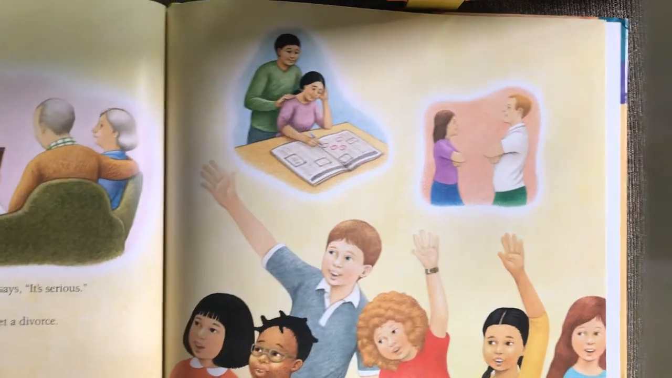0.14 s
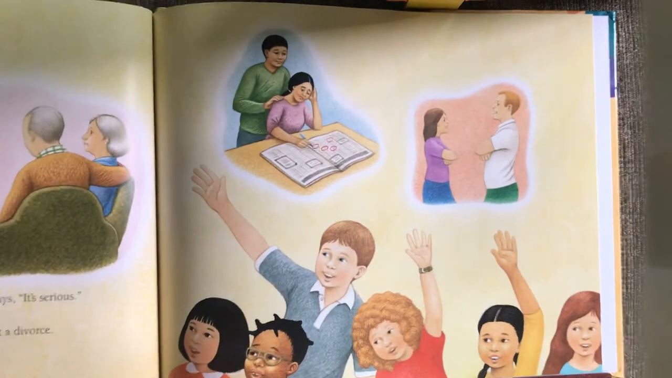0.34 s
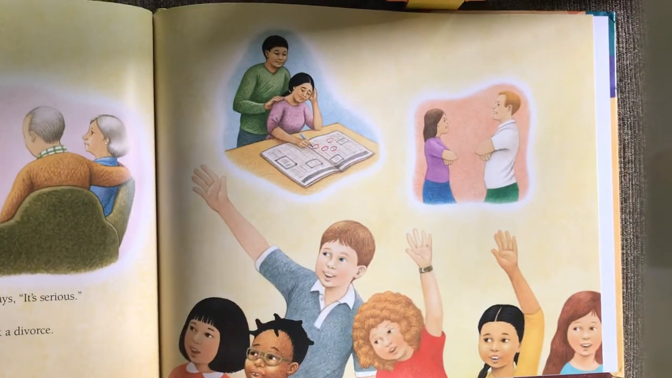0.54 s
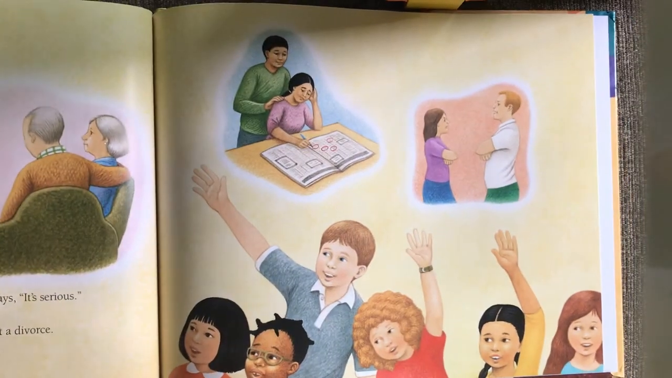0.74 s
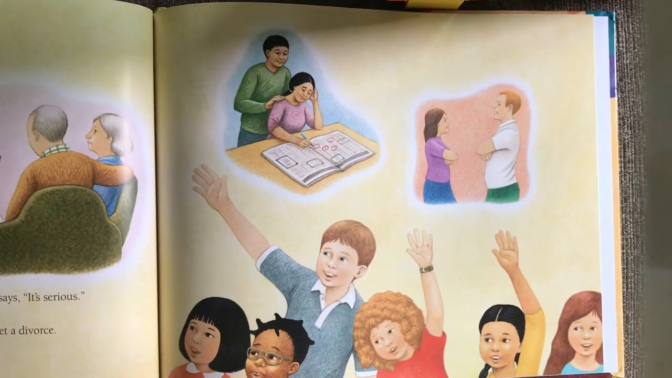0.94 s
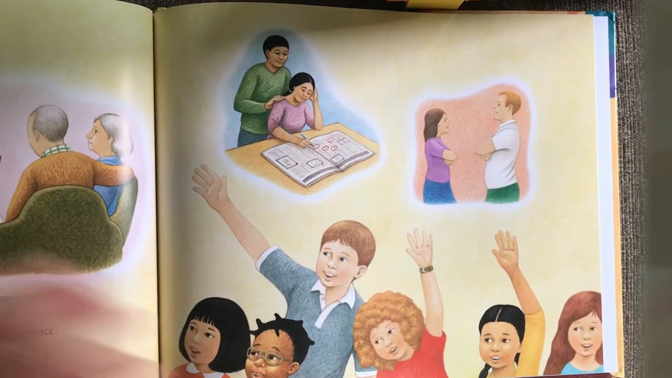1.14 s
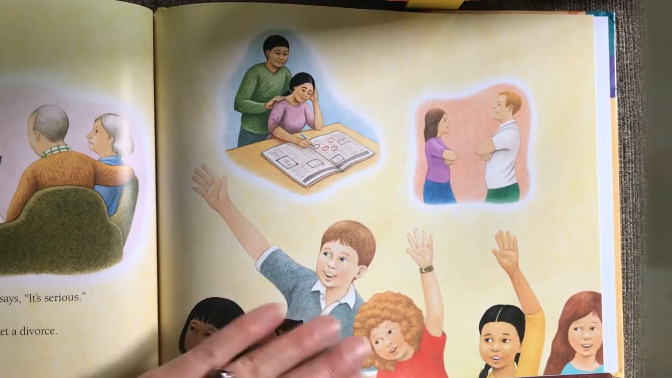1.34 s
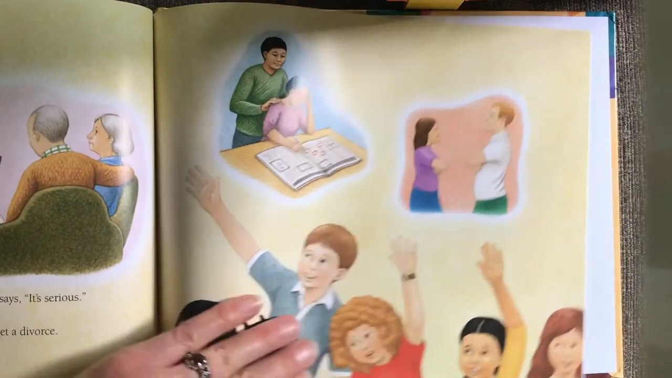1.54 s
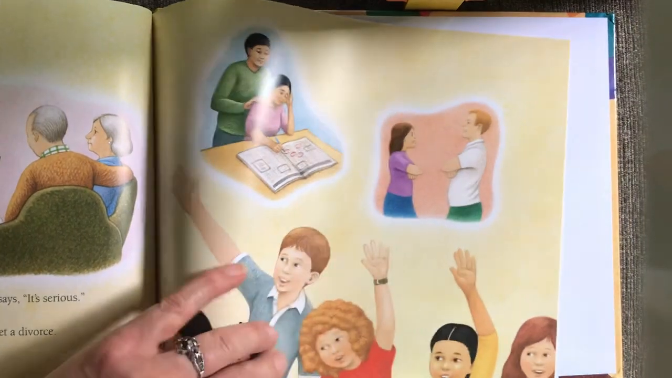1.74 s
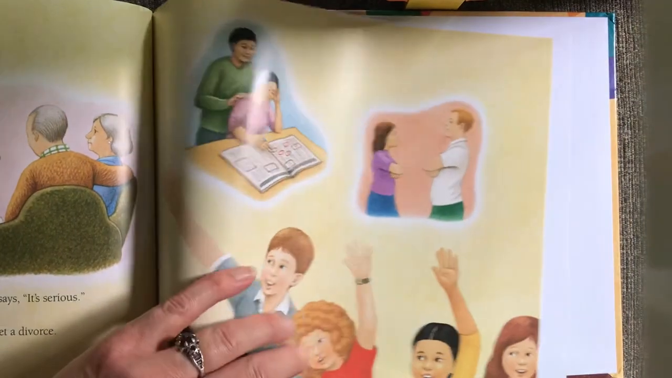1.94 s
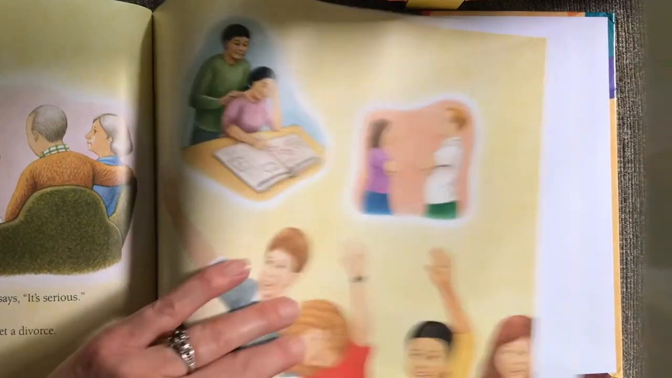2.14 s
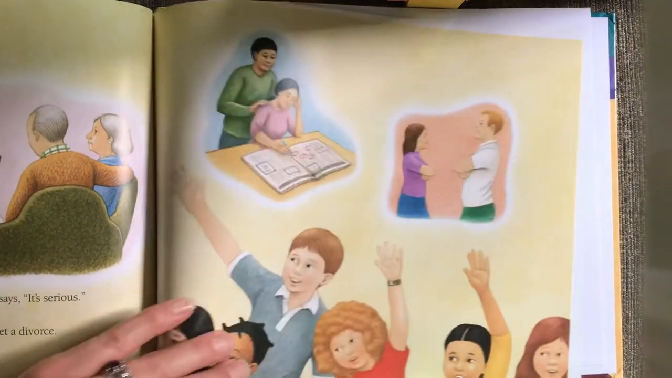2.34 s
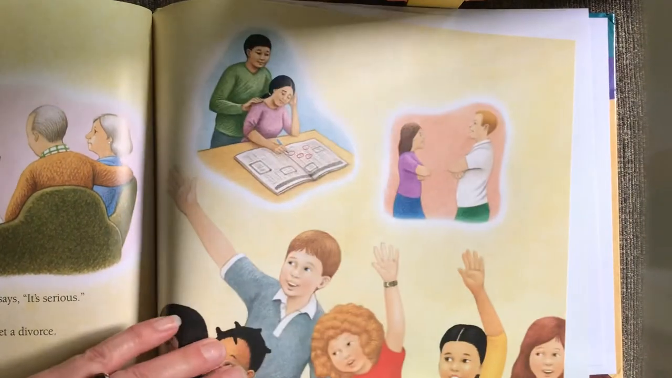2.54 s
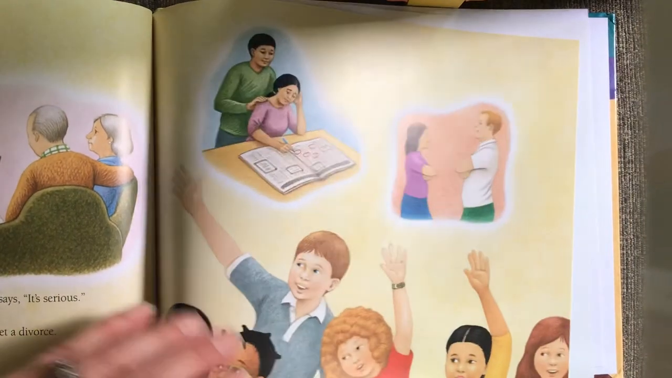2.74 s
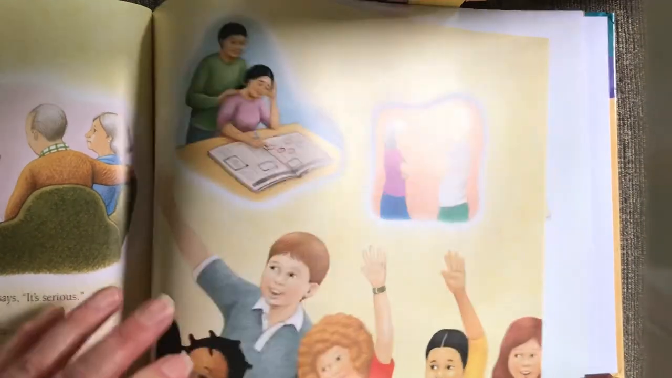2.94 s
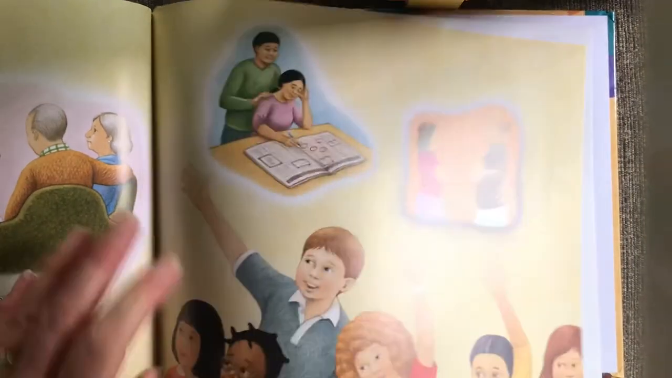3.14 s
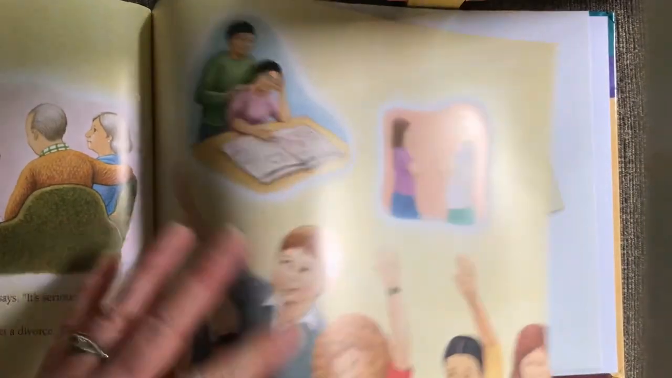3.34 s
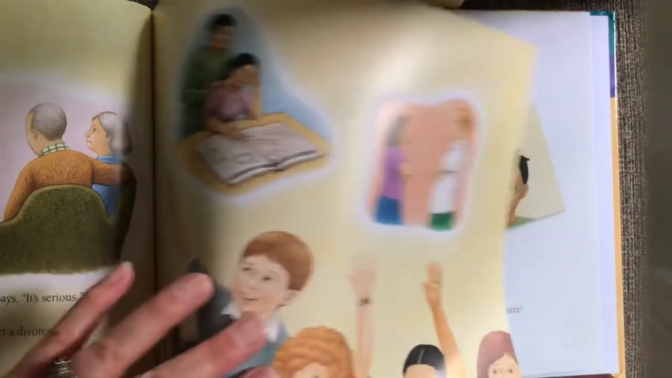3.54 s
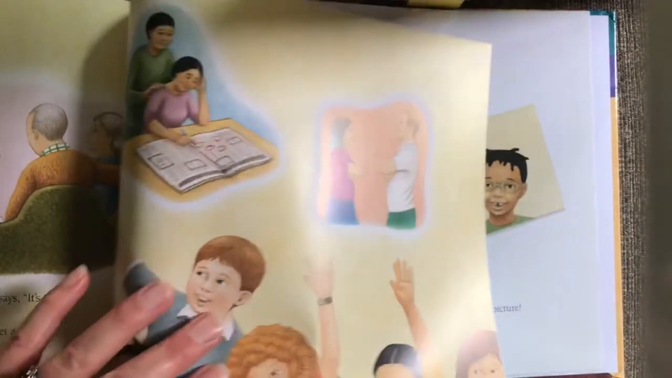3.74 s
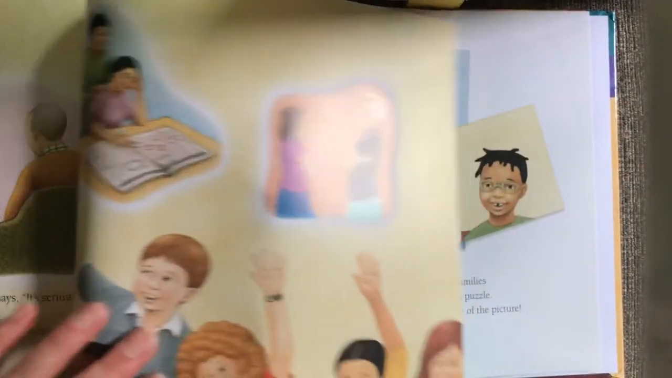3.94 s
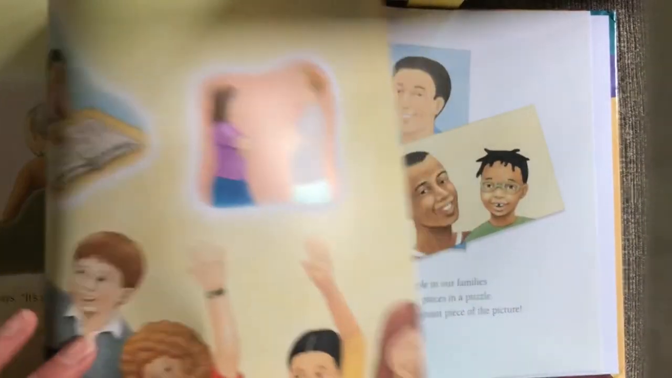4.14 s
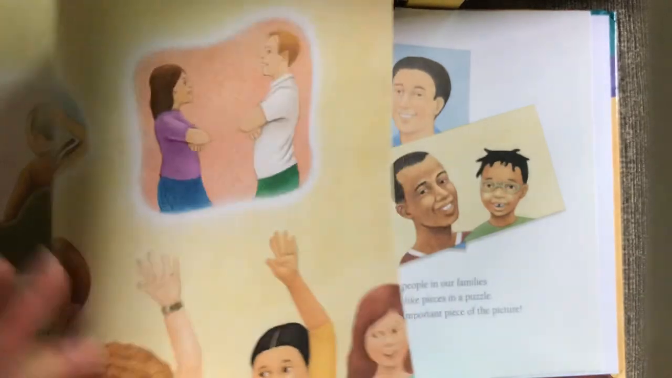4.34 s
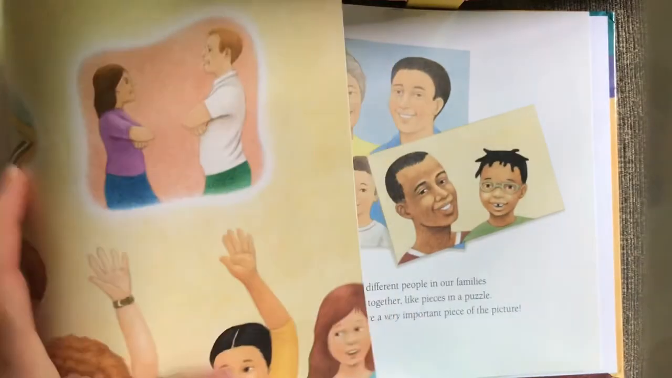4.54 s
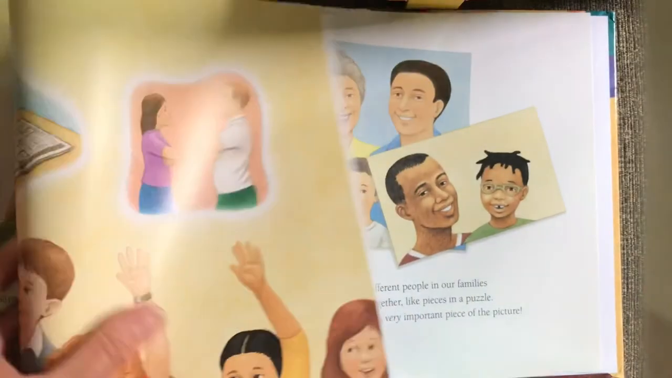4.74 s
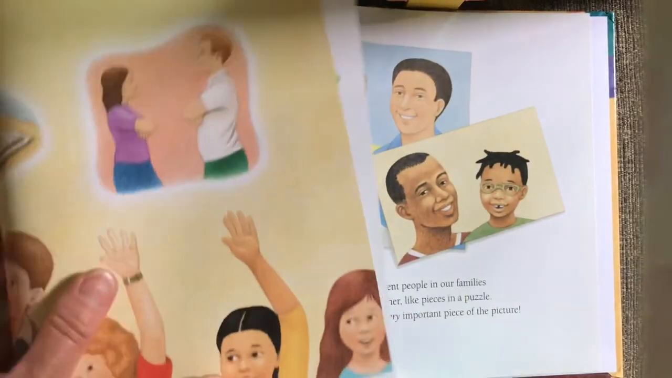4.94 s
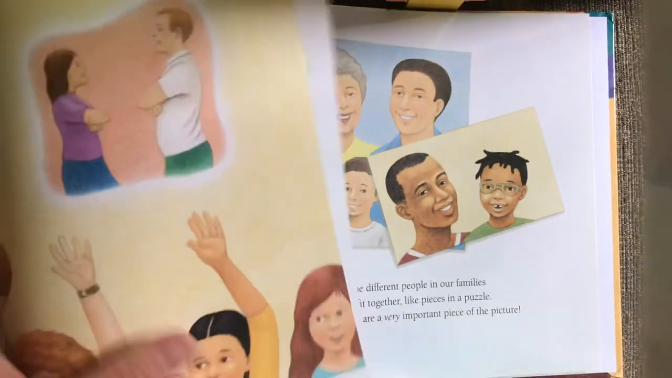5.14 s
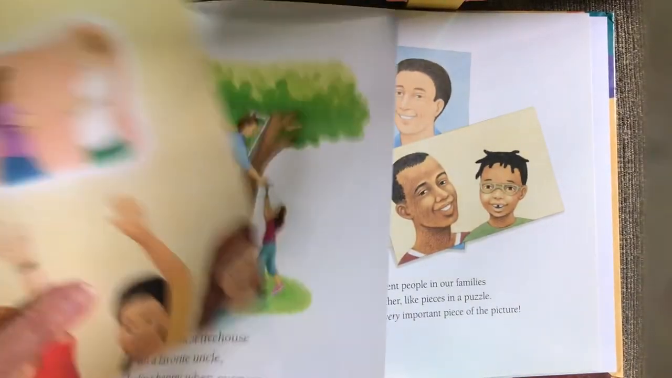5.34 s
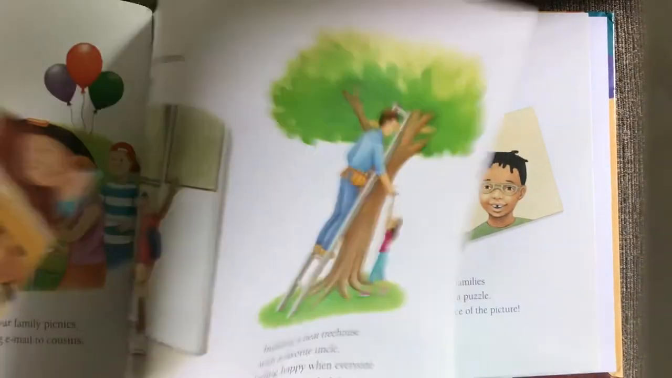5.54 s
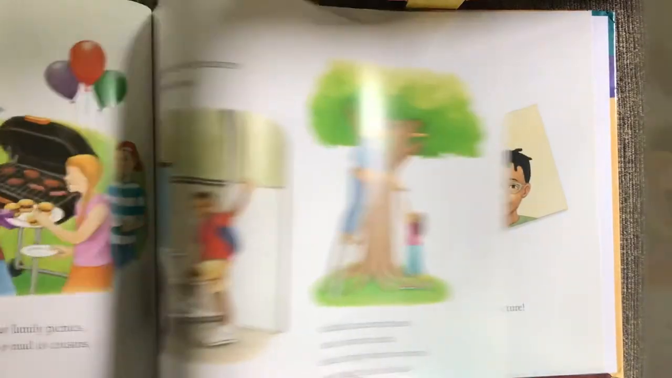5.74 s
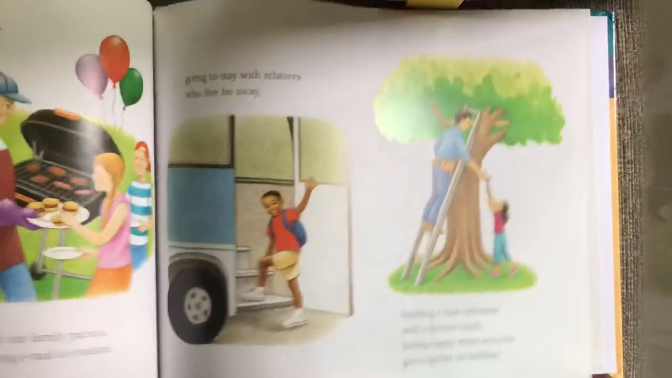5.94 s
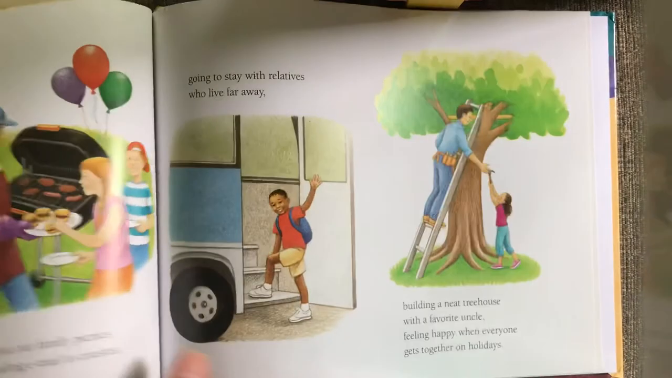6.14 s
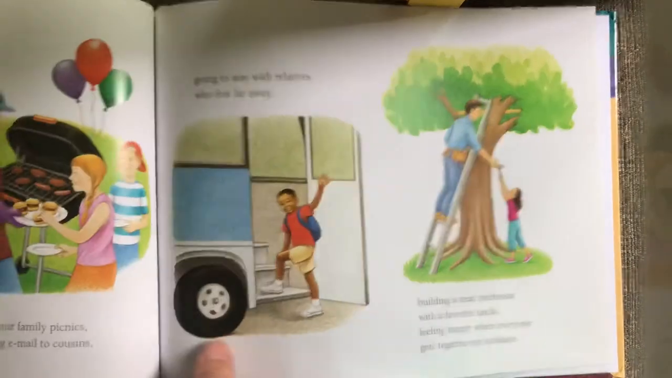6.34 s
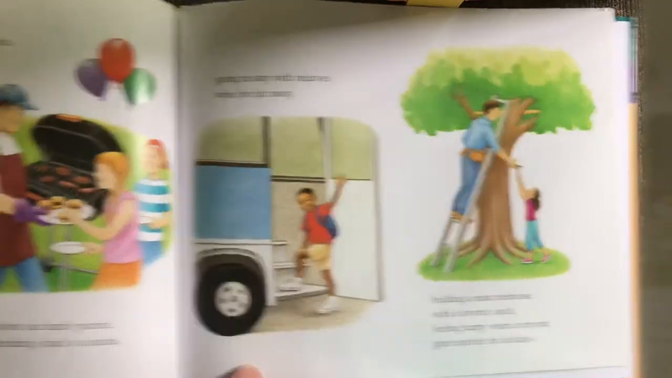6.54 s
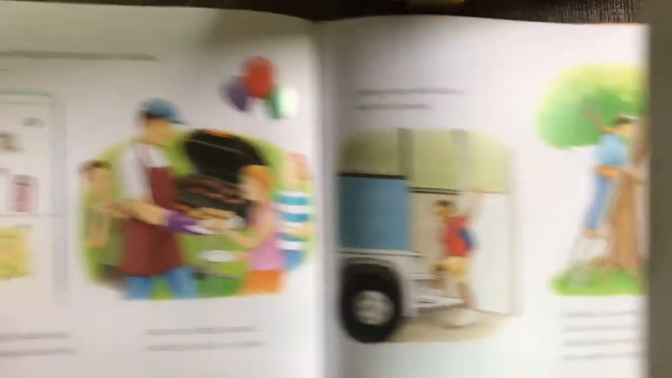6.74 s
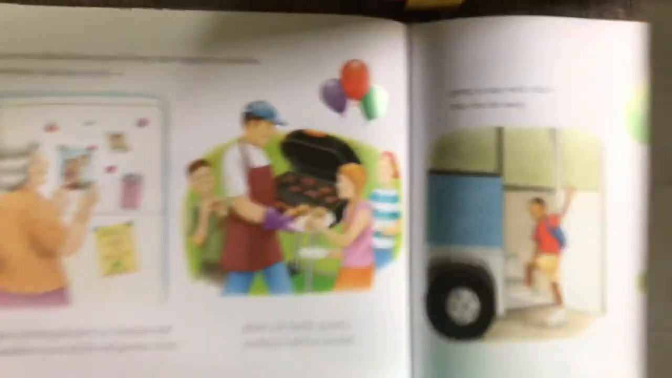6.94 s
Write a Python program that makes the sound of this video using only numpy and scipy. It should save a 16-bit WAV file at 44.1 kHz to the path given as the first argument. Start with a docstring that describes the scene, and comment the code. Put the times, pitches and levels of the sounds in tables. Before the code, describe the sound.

Glossy pages of a hardcover book rubbed, lifted and flipped by hand close up in a quiet room, with crisp crackles, soft thumps and faint clicks.

```python
"""Leafing through a hardcover book

Fingers drag across glossy pages, lift and flip them, and the book is slid aside on a table.
Dragging is hiss made of tiny random slips; sliding makes coarser slips ring the cover.
Bent sheets snap as short pushes and slips, and finger taps thump by ringing the cover's modes.
Two faint dry clicks are short high rings; shaped noise makes the room hum, and a faint tail its echo."""
import sys
import numpy as np
from scipy import signal
from scipy.fft import rfft, irfft
from scipy.io import wavfile

SR = 44100
rng = np.random.default_rng(int(sys.argv[2]) if len(sys.argv) > 2 else 0)


def waveform_to_disk(signal):
    """Save audio, clipped to [-1, 1], as 16-bit WAV at the path in sys.argv[1]."""
    frames = np.transpose(np.atleast_2d(signal))
    scaled = np.clip(frames, -1, 1) * 32767
    samples = np.round(scaled).astype(np.int16)
    wavfile.write(sys.argv[1], SR, samples)


N = 312228   # length in samples, about 7.1 s

# background of the quiet room, relative spectrum: (frequency [Hz], level [dB per Hz])
ROOM_SPECTRUM = [(15, -57), (25, -44), (43, 2.5), (65, -4.5), (131, -17.5), (321, -9.5), (358, -9.5),
                 (496, -16), (809, -18.5), (1060, -15), (1320, -18), (3810, -25), (7510, -31), (15200, -30),
                 (16500, -43)]
# strokes of skin or paper over paper, one curve each: (time [s], hiss level [dB])
STROKE_CURVES = [
    [(0.0, -66), (0.052, -67), (0.239, -68)],
    [(0.243, -71.5), (0.339, -58.5), (0.343, -79)],
    [(0.782, -56.5), (0.798, -58), (0.93, -76.5)],
    [(1.385, -72.5), (1.477, -57.5), (1.568, -59.5), (1.592, -63.5), (1.716, -54), (1.772, -62.5),
     (1.788, -59)],
    [(1.792, -63), (1.824, -50), (1.948, -44), (2.023, -51.5), (2.039, -65)],
    [(2.047, -67), (2.095, -51.5), (2.155, -43.5), (2.275, -55.5), (2.327, -53), (2.355, -58), (2.383, -62)],
    [(2.387, -58), (2.415, -46.5), (2.494, -48.5), (2.534, -68), (2.566, -77)],
    [(2.578, -74), (2.594, -60.5), (2.63, -66), (2.666, -52), (2.726, -50.5), (2.774, -54.5),
     (2.929, -48.5), (2.949, -57)],
    [(2.953, -56), (3.005, -49), (3.081, -45), (3.105, -54), (3.173, -62), (3.197, -64)],
    [(3.209, -65), (3.233, -67), (3.245, -59), (3.304, -63), (3.332, -45), (3.372, -45.5), (3.384, -54.5),
     (3.652, -48.5), (3.732, -53.5), (3.867, -49.5), (3.883, -54)],
    [(3.887, -64), (3.907, -59), (4.031, -62), (4.071, -50), (4.147, -61)],
    [(4.159, -58), (4.198, -58.5), (4.262, -44), (4.31, -51.5), (4.33, -69), (4.39, -58), (4.398, -81)],
    [(4.45, -80), (4.486, -60), (4.558, -66), (4.578, -47), (4.665, -53), (4.697, -43), (4.801, -50.5),
     (4.837, -80)],
    [(4.869, -63), (4.913, -46), (4.977, -60), (5.033, -46.5), (5.068, -55.5), (5.096, -80)],
    [(5.148, -69), (5.156, -57), (5.192, -42.5), (5.292, -37), (5.42, -45.5), (5.432, -48)],
    [(5.44, -49), (5.472, -34), (5.519, -61)],
    [(5.527, -54.5), (5.695, -43.5), (5.811, -48.5), (5.835, -47), (5.867, -45.5), (5.887, -72)],
    [(5.907, -63), (5.954, -53), (6.01, -83), (6.026, -71)],
    [(6.038, -67), (6.05, -71), (6.154, -53.5), (6.178, -69), (6.21, -49.5), (6.242, -46.5), (6.27, -61),
     (6.29, -55.5)],
    [(6.314, -56.5), (6.425, -63.5), (6.465, -55.5), (6.517, -56.5)],
    [(6.521, -60.5), (6.593, -40.5), (6.653, -54), (6.908, -57.5), (6.924, -54), (6.964, -66), (7.048, -71),
     (7.072, -70)],
]
# how the sheet is bent under each stroke: (favoured band [Hz], that band re hiss [dB],
# top re hiss [dB], sheet body re hiss at a middling level [dB])
SHEET_BENDS = [(4200, -21, -15, 0.5), (3750, 11, 3.5, 2), (4050, 2, -6, -11), (6170, -8, 1.5, -0.5),
               (5400, 5, -5, -2), (4500, -2, -1, -1.5), (4670, -9, -3, -2), (4540, -3, -7, .5),
               (3950, -10, -4, -1), (4780, -2, -4, -2), (5600, -3, -4.5, 2), (6270, -1.5, -2.5, -1.5),
               (6140, -7, 3, -2.5), (5850, -1, .5, -1.5), (5780, -2.5, 1, -3), (2700, 10, -11, 11),
               (5650, 0.5, 0, -4), (8600, 3, -1, -5.5), (4440, -15, -2.5, -9), (3830, -4, -1, 2),
               (4050, -1, -6.5, 3)]
# colour of the rubbing hiss, relative spectrum: (frequency [Hz], level [dB per Hz])
HISS_SPECTRUM = [(1060, -4), (1800, -3), (2190, -10), (2440, -1), (3030, -5.5), (3810, -5.5), (4110, -6),
                 (5580, -5.5), (7430, -7.5), (8460, -7), (10600, -11.5), (12700, -11.5), (15200, -13.5),
                 (16000, -13), (16500, -36)]
# resonances of the sheet under the fingers: (frequency [Hz], width before widening [Hz], level [dB])
SHEET_MODES = [(666, 145, -2), (950, 130, -6.5), (1130, 130, 0.5), (1377, 135, -4.5), (1780, 300, -6)]
# the book moves on the table: (time [s], cover rumble level [dB])
BOOK_MOVES = [(0.0, -71), (1.47, -69), (1.65, -51), (2.0, -52), (2.31, -68), (2.43, -50.5), (2.6, -62),
              (2.76, -54), (3.15, -53), (3.25, -75), (3.38, -47.5), (3.5, -56), (4.02, -59), (4.2, -56),
              (4.59, -67), (4.83, -67), (4.97, -61), (5.24, -57.5), (5.5, -47), (5.7, -72), (5.83, -45.5),
              (6.03, -68), (6.13, -57), (6.43, -68), (6.61, -43), (6.78, -41.5), (6.97, -60), (7.08, -64.5)]
# uneven deep rumble under the scene: (time [s], level [dB])
DEEP_RUMBLE = [(0.0, -70), (0.28, -68), (0.31, -45), (0.36, -68), (1.32, -68.5), (2.2, -64), (3.2, -76),
               (3.98, -64.5), (4.1, -49.5), (4.22, -63), (4.69, -54), (4.8, -70), (5.15, -57), (5.6, -74.5),
               (6.5, -59.5), (6.78, -54), (7.08, -58)]
# modes of cover and table, the lower mode first:
# (frequency [Hz], level [dB], time to fade by 60 dB before any damping [s])
COVER_MODES = [(181.4, -6.5, 0.13), (242.4, -0.5, 0.061), (306.7, -1, 0.05), (381.3, -12, 0.11),
               (492, -7, 0.067), (805, -45, 0.021), (1284, -26, 0.09), (1750, 2.5, 0.02)]
# the sheet buckles: (time [s], ring peak [dB], sheet pitch [Hz],
# time for the creeping push to fade by 60 dB [s], slip peak [dB], slip length [ms])
BUCKLES = [(0.221, -60, 950, 0.03, -57, 11), (0.330, -39, 1030, 0.03, -54, 13.5),
           (0.384, -58, 641, .05, -50.5, 6.2), (0.485, -51.5, 1080, 0.062, -48, 14),
           (0.892, -43.5, 814, 0.034, -54, 8.3), (1.388, -51, 980, 0.051, -64, 5.5),
           (1.574, -37.5, 1200, 0.046, -41.5, 6), (2.029, -35, 850, .058, -48, 3.8),
           (2.053, -37, 710, .05, -49, 5.6), (2.164, -23, 1450, 0.079, -27, 4.8),
           (2.31, -37.5, 760, 0.043, -40.5, 14), (2.401, -34.5, 1240, 0.1, -35, 5.5),
           (2.422, -30, 1096, 0.14, -33, 6.2), (2.462, -36, 1020, .097, -45, 7.9),
           (2.656, -39, 1490, .05, -42, 4), (2.866, -26.5, 1190, 0.025, -30, 7.5),
           (2.988, -50, 1220, 0.018, -32, 4), (2.999, -15, 1180, 0.061, -18.5, 10.6),
           (3.005, -38, 1290, 0.013, -16.5, 3.4), (3.084, -30.5, 1030, .043, -43, 10),
           (3.323, -35, 1340, 0.049, -28.5, 3.6), (3.643, -25, 1790, .04, -27, 8.1),
           (3.647, -18, 714, 0.026, -29, 6), (3.878, -34, 653, .15, -35, 3.3),
           (3.966, -38.5, 610, 0.036, -36.5, 5), (3.995, -39, 650, .039, -50, 6.7),
           (4.03, -38, 925, 0.018, -45, 6.3), (4.052, -32, 1320, .029, -33, 2.3),
           (4.066, -34.5, 870, 0.048, -49, 5.3), (4.082, -28.5, 774, 0.074, -44, 5),
           (4.096, -36, 630, 0.11, -50, 14), (4.115, -41, 851, 0.094, -48, 5.1),
           (4.139, -38, 676, .059, -40, 3.3), (4.158, -33.5, 1780, 0.042, -26, 2.1),
           (4.209, -51, 1000, .05, -31.5, 6.7), (4.225, -45.5, 1210, 0.13, -29, 11.4),
           (4.319, -43.5, 870, 0.12, -31, 9), (4.367, -32.5, 590, 0.04, -31, 8.8),
           (4.439, -32, 800, 0.038, -28.5, 11.8), (4.49, -30.5, 610, 0.031, -29, 11),
           (4.57, -41, 726, 0.053, -45, 4.2), (4.582, -19, 746, 0.029, -21, 5.7),
           (4.621, -30.5, 680, 0.025, -25, 4.1), (4.662, -48, 890, .045, -23.5, 3.6),
           (4.69, -22, 930, 0.04, -37, 4.8), (4.873, -36.5, 685, 0.049, -33.5, 5.8),
           (5.013, -43, 683, .037, -31, 6.3), (5.035, -36, 696, 0.18, -58, 8.9),
           (5.154, -38, 655, 0.22, -38.5, 8), (5.267, -19.5, 1130, 0.083, -44, 25),
           (5.368, -20, 1350, 0.054, -46, 8), (5.436, -8, 1220, 0.063, -12.5, 3.5),
           (5.448, -20, 1510, 0.047, -39, 4.9), (5.462, -32, 890, 0.095, -37, 4.6),
           (5.475, -23.5, 660, 0.11, -32.5, 8.2), (5.486, -28, 930, 0.037, -40, 5),
           (5.528, -19, 1400, 0.036, -22, 3.8), (5.561, -42, 1800, 0.054, -29.5, 5),
           (5.678, -45, 1130, 0.063, -22, 2.5), (5.822, -36.5, 1130, 0.052, -33, 4.4),
           (5.845, -36, 1180, 0.081, -29, 3), (5.874, -33, 947, 0.069, -46, 5),
           (6.002, -45, 1090, .03, -60, 3.5), (6.076, -45, 1060, 0.2, -44.5, 15),
           (6.283, -46, 1055, 0.19, -46, 4), (6.313, -23.5, 1290, 0.076, -22.5, 5.7),
           (6.321, -28.5, 890, 0.075, -42, 4.7), (6.834, -42.5, 630, 0.078, -51, 2.5),
           (6.848, -45, 626, 0.057, -41, 6.5), (6.921, -29, 2000, 0.069, -32.5, 8.8),
           (6.934, -40, 780, 0.065, -47, 6.6)]
# taps and knocks on the cover: (time [s], peak [dB], share of the upper modes [0-1],
# damping by the hand [divides the fade time])
COVER_TAPS = [(0.292, -35, 0.53, 0.92), (1.575, -22, 0.46, 0.81), (2.03, -35, 0.42, 1.1),
              (2.166, -29, 0.98, 0.77), (2.311, -29, 0.46, 0.62), (2.728, -32, 0.47, 1.15),
              (2.845, -29.5, 0.4, 0.54), (3.059, -34, 0.3, 0.61), (3.091, -32, 0.13, 0.51),
              (3.12, -25.5, 1, 0.69), (3.134, -28.5, 0.15, 1.2), (3.324, -29, 0.35, 0.99),
              (3.882, -33, 0.63, 0.8), (4.579, -35, 0.4, 1.7), (4.685, -35, 0.48, 1.1),
              (5.157, -40, 0.5, 1.2), (5.268, -32.5, 0.6, 0.79), (5.436, -33, 1, 0.5),
              (5.527, -33, 0.3, 0.76), (5.682, -28.5, 0.5, 0.69), (5.766, -35, 0.55, 1.1),
              (6.319, -25.5, 1, 0.66), (6.551, -36.5, 0.12, 1.1), (6.621, -36.5, 0.03, 0.95),
              (6.742, -24.5, 0.25, 1.4), (6.871, -27, 0.2, 1.2), (6.917, -18, 0.55, 0.85)]
# faint dry clicks nearby: (time [s], ring level [dB], broad crack re ring [dB])
DRY_CLICKS = [(0.72, -38.5, -18), (0.7805, -30.5, 2)]
# bands weakened by the microphone housing: (frequency [Hz], width [Hz], depth [0-1])
HOUSING_DIPS = [(2350, 650, 0.36), (7600, 760, 0.49), (10600, 320, 0.73)]

ROOM_DB = -65
EDGE_S, STOP_S = 0.0013, 0.018   # a stroke starts and dies away this fast
TOP_FROM_HZ = 6720               # the hiss above this has its own level in each stroke
BODY_FOLLOWS, MIDDLING_DB = 0.74, -53   # the sheet body swings less than the hiss
ROUGHNESS = 0.45                 # how much a buckle creeps and spreads over more modes [0-1]
SUDDEN_MS = 5.5                  # slips longer than this swell in with a weaker flip
CLICK_HZ, CLICK_T60_S = 4020, 0.0065
CUTOFF_HZ = 16100


def from_db(db):
    """Turns decibels into gain."""
    return 10 ** (np.asarray(db) / 20)


def rms_one(x):
    """Scales a sound to an average (rms) strength of 1."""
    return x / np.sqrt(np.mean(x ** 2) + 1e-20)


def in_time(rows):
    """Draws a level curve, sample by sample."""
    return np.interp(np.arange(N) / SR, *np.transpose(rows))


def butter_filter(x, order, hz, kind):
    """Keeps the part of a sound above an edge ("high") or between two ("band")."""
    return signal.sosfilt(signal.butter(order, hz, kind, fs=SR, output="sos"), x)


def drift(rate_hz):
    """Slow random wandering of average strength 1."""
    # made at a 40th of the sample rate, then drawn out; the first 2000 values let it settle
    r = np.exp(-80 * np.pi * rate_hz / SR)
    noise = rng.standard_normal(N // 40 + 2002)
    slow = signal.lfilter([1], [1, -2 * r, r * r], noise)[2000:]
    return np.interp(np.arange(N) / 40, np.arange(len(slow)), rms_one(slow))


def colour(x, spectrum):
    """Shapes the frequencies of a noise with a curve in dB per Hz."""
    hz = np.maximum(np.fft.rfftfreq(N, 1 / SR), 1)
    table_hz, table_db = np.transpose(spectrum)
    gain = from_db(np.interp(np.log(hz), np.log(table_hz), table_db))
    return irfft(rfft(x) * gain, N)


def ring(x, hz, t60):
    """A fading sine set off by a push; t60 is the time in seconds to fade by 60 dB."""
    r, w = from_db(-60 / (t60 * SR)), 2 * np.pi * hz / SR
    # the tiny offset keeps the numbers from becoming too small to compute quickly
    return signal.lfilter([0, np.sin(w)], [1, -2 * r * np.cos(w), r * r], x + 1e-18)


def resonance(x, hz, width_hz):
    """Lets through one band, with a gain of about 1 at its centre."""
    r = np.exp(-np.pi * width_hz / SR)
    feedback = [1, -2 * r * np.cos(2 * np.pi * hz / SR), r * r]
    return signal.lfilter(np.array([1, 0, -1]) * (1 - r * r) / 2, feedback, x)


def add(out, s, sound):
    """Mixes in a short sound at a time in seconds."""
    at = round(s * SR)
    out[at:at + len(sound)] += sound[:N - at]


def crack(noise, length_s):
    """A quick slip: a swelling and fading scrap of noise, peak 1."""
    progress = np.clip(np.arange(len(noise)) / SR / length_s, 0, 1)
    burst = noise * np.sin(np.pi * progress ** .75)
    return burst / np.abs(burst).max()


def slips(per_s, spread_db, clump_db):
    """Skin and paper stick and slip: uneven ticks that come in clumps."""
    unevenness = from_db(spread_db * np.minimum(rng.exponential(1, N), 5))
    sizes = unevenness * rng.standard_normal(N)
    happens = rng.random(N) < per_s / SR
    return rms_one(sizes * happens * from_db(clump_db * drift(33.0)))


def low_cut(x):
    """The book is too small to radiate deep bass."""
    return butter_filter(x, 4, 125, "high")


def room_hum():
    """Steady shaped noise for the quiet room, its level wandering a little."""
    level_db = ROOM_DB + 1.0 * drift(5)
    return from_db(level_db) * rms_one(colour(rng.standard_normal(N), ROOM_SPECTRUM))


def walls(x, t60, dull_hz):
    """Faint diffuse tail of a small furnished room, made from dulled, fading noise."""
    t = np.arange(int(.4 * SR)) / SR
    tail = rng.standard_normal(len(t)) * from_db(-60 * t / t60) * (t > .006)
    tail = signal.lfilter(*signal.butter(1, dull_hz, fs=SR), tail)
    return signal.fftconvolve(x, tail / np.sqrt(np.sum(tail ** 2)))[:N]


def patchy(x, patchy_db):
    """The sheet's shape keeps changing, so narrow bands swell and fade each on its own."""
    edges = np.geomspace(1500, 16500, num=15)
    out = np.zeros(N)
    for band in zip(edges, edges[1:]):
        band_filter = signal.butter(2, band, "band", fs=SR, output="sos")
        out += from_db(patchy_db * drift(15.8)) * signal.sosfiltfilt(band_filter, x)
    return out


def sheet_body(drive):
    """The bending sheet rings low under the slips, favouring now one band, now another."""
    body = np.zeros(N)
    for k, (hz, width_hz, db) in enumerate(SHEET_MODES):
        wide_hz = 2.03 * width_hz
        mode = resonance(resonance(drive, hz, wide_hz), hz, wide_hz)
        body += (-1) ** k * from_db(db + 2.2 * drift(9.4)) * mode   # neighbours push opposite ways
    return rms_one(body)


def strokes():
    """Slips heard directly as hiss, coloured by the sheet's bend, and through its low resonances."""
    fine = slips(per_s=24000, spread_db=0.0, clump_db=2.0)
    crackle = slips(per_s=200, spread_db=6.0, clump_db=5.5)      # fibres let go one by one
    hiss = patchy(colour(fine + from_db(-15) * crackle, HISS_SPECTRUM), patchy_db=2.5)
    top = signal.sosfiltfilt(signal.butter(4, TOP_FROM_HZ, "high", fs=SR, output="sos"), hiss)
    low, top = rms_one(hiss - top), rms_one(top)
    coarse = slips(per_s=4000, spread_db=2.0, clump_db=3.0)
    body = sheet_body(coarse + from_db(-14.5) * crackle)
    out = np.zeros(N)
    for rows, (hz, band_db, top_db, body_db) in zip(STROKE_CURVES, SHEET_BENDS):
        start, end = rows[0][0], rows[-1][0]
        at = np.arange(round(start * SR), min(round((end + STOP_S) * SR), N))
        t = at / SR
        fade_in = np.clip((t - start) / EDGE_S, 0, 1)
        fade_out = np.clip((end + STOP_S - t) / STOP_S, 0, 1)
        level_db = np.interp(t, *np.transpose(rows))
        band = rms_one(resonance(hiss[at], hz, 0.2 * hz))
        bright = rms_one(low[at] + from_db(band_db) * band) + from_db(top_db) * top[at]
        body_gain = from_db(body_db + (BODY_FOLLOWS - 1) * (level_db - MIDDLING_DB))
        out[at] += fade_in * fade_out * from_db(level_db) * (bright + body_gain * body[at])
    return out


def rubbing():
    """Coarse slips ring the cover, over an uneven deep rumble of low noise."""
    push = slips(per_s=2500, spread_db=0.5, clump_db=3.5)
    push = signal.lfilter(*signal.butter(1, 300, fs=SR), push)   # the page stack cushions the slips
    # rubbing shortens the cover's ring
    rumble = low_cut(sum(from_db(db) * ring(push, hz, 0.45 * t60) for hz, db, t60 in COVER_MODES))
    deep = butter_filter(rng.standard_normal(N), 2, [52, 100], "band")
    cover_gain = from_db(in_time(BOOK_MOVES))
    deep_gain = from_db(in_time(DEEP_RUMBLE) + 3.5 * drift(11))
    return cover_gain * rms_one(rumble) + deep_gain * rms_one(deep)


def favoured_hz(s):
    """The band favoured by the stroke that started last."""
    starts = [rows[0][0] for rows in STROKE_CURVES]
    return SHEET_BENDS[max(np.searchsorted(starts, s) - 1, 0)][0]


def snaps():
    """Each buckle is a flip and a slip that ring three sheet modes, with the slip's hiss on top."""
    out, draws = np.zeros(N), rng.standard_normal((len(BUCKLES), 6000))
    hiss = butter_filter(colour(rng.standard_normal(N), HISS_SPECTRUM), 1, 600, "high")
    t = np.arange(6000) / SR
    modes = ((.74, -1.1 * ROUGHNESS), (1, 1), (1.33, -1.5 * ROUGHNESS))   # (pitch ratio, gain)
    for (s, peak_db, hz, t60, slip_db, length_ms), draw in zip(BUCKLES, draws):
        t60, length_s = np.clip(t60, .008, .2), length_ms / 1000
        sudden = min(SUDDEN_MS / length_ms, 1)
        swell = np.clip(sudden + 2 * t / length_s, 0, 1)
        creep = 1.05 * ROUGHNESS * draw * swell * from_db(-60 * t / t60)   # the crease keeps creeping
        push = creep + .5 * crack(draw, length_s)
        push[:22] += sudden ** 2 * np.hanning(22)   # the flip, half a millisecond long
        tone = sum(gain * ring(push, hz * ratio, 0.16 * t60) for ratio, gain in modes)
        tone = butter_filter(tone, 2, [450, 2600], "band")
        scrap, slip_hz = np.roll(hiss, -round(s * SR))[:6000], favoured_hz(s)
        slip = crack(0.57 * scrap + resonance(scrap, slip_hz, 0.1 * slip_hz), length_s)
        add(out, s, from_db(peak_db) * tone / np.abs(tone).max() + from_db(slip_db) * slip)
    return out


def thumps():
    """A soft fingertip push with a harder contact within it rings the cover's modes."""
    out, push = np.zeros(N), np.zeros(12000)
    push[:110] = np.hanning(110)
    push[60:76] += 1.2 * np.hanning(16)
    spread_db = 2.0 * rng.standard_normal((len(COVER_TAPS), len(COVER_MODES)))   # no two taps alike
    for (s, peak_db, upper, damping), spread in zip(COVER_TAPS, spread_db):
        modes = np.array([from_db(db) * ring(push, hz, t60 / damping) for hz, db, t60 in COVER_MODES])
        shares = np.r_[1 - upper, np.full(len(COVER_MODES) - 1, upper)]
        knock = low_cut((from_db(spread) * shares) @ modes)
        add(out, s + 0.00219, from_db(peak_db) * knock / np.abs(knock).max())
    return out


def clicks():
    """Tiny ticks: one short high ring with a broad crack of noise."""
    out, draws = np.zeros(N), rng.standard_normal((len(DRY_CLICKS), 2000))
    tick = ring(np.arange(2000) == 0, CLICK_HZ, CLICK_T60_S)
    for (s, peak_db, crack_db), draw in zip(DRY_CLICKS, draws):
        noise = crack(np.diff(draw, prepend=0), length_s=0.0026)   # the difference favours the treble
        add(out, s, from_db(peak_db) * (tick + from_db(crack_db) * noise))
    return out


def scene():
    """Book close to the microphone, room around it."""
    book = strokes() + rubbing() + snaps() + thumps() + clicks()
    room = room_hum()
    echo = from_db(-22.5) * walls(book, t60=0.24, dull_hz=4000)
    return (book + echo + room)[None]


def record(dry):
    """The microphone housing weakens three narrow bands; the top is cut steeply."""
    for hz, width_hz, depth in HOUSING_DIPS:
        dry = dry - depth * resonance(dry, hz, width_hz)
    return signal.sosfilt(signal.cheby2(22, 60, CUTOFF_HZ, fs=SR, output="sos"), dry)


dry = scene()
out = record(dry)
waveform_to_disk(out)
```